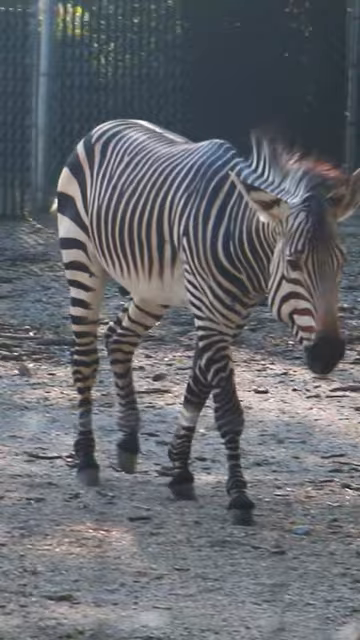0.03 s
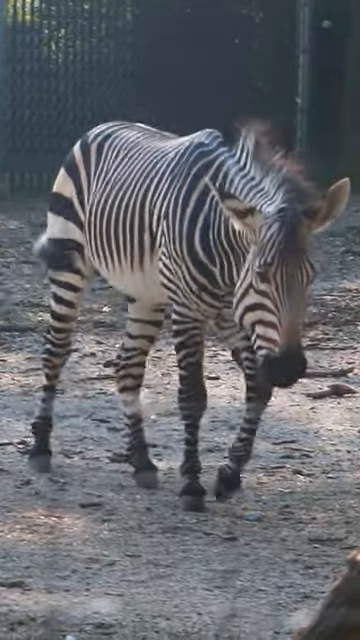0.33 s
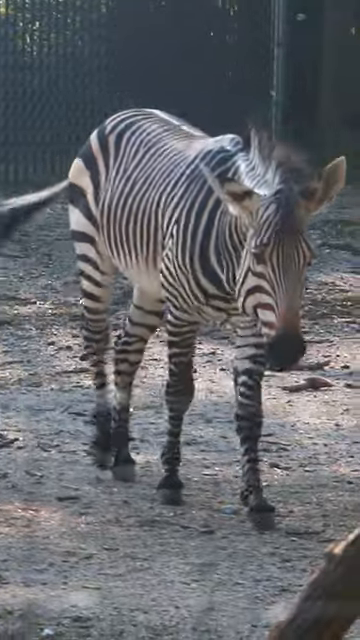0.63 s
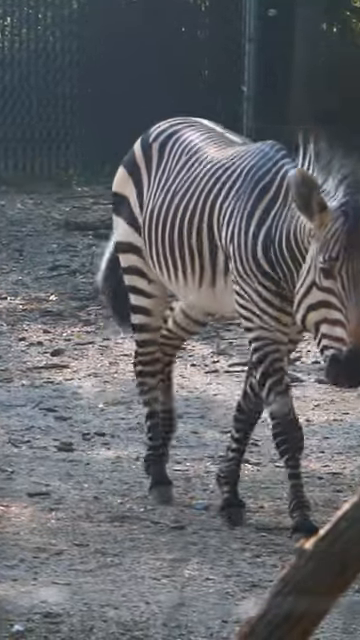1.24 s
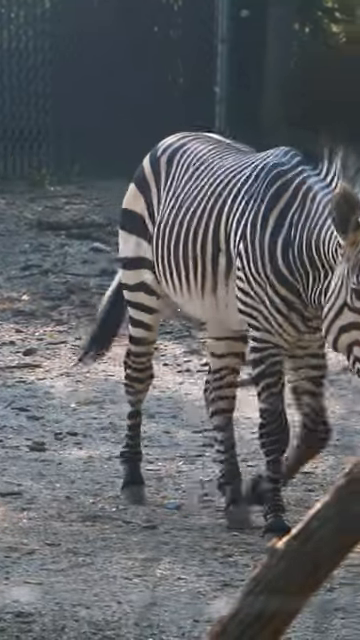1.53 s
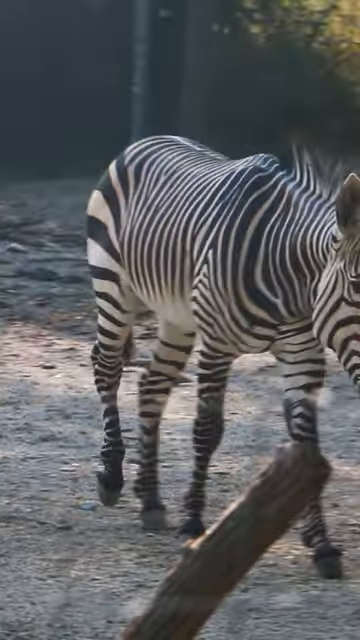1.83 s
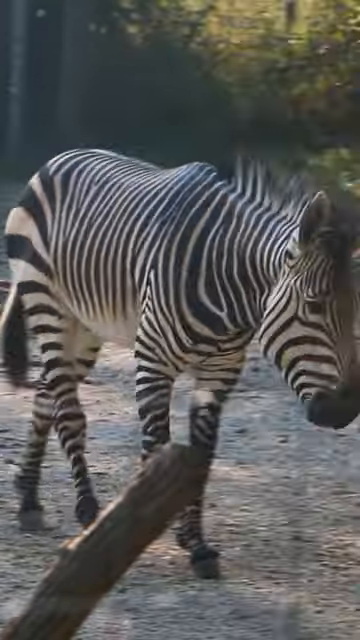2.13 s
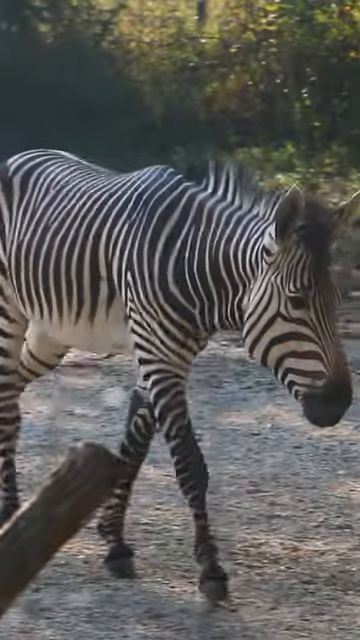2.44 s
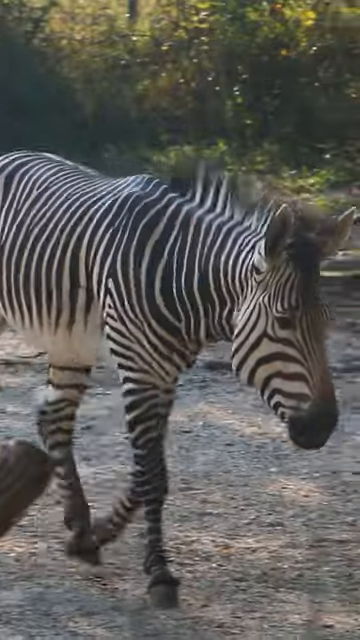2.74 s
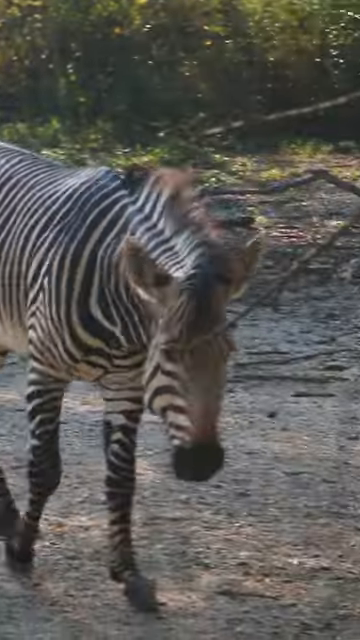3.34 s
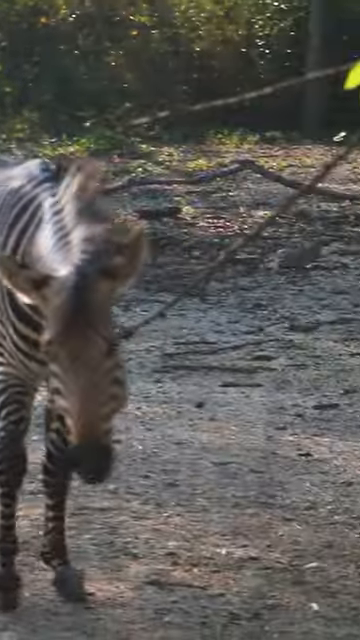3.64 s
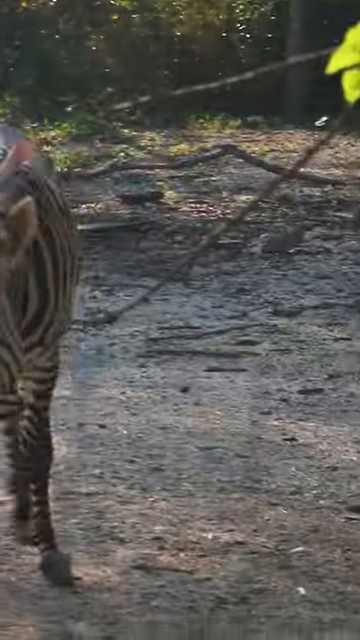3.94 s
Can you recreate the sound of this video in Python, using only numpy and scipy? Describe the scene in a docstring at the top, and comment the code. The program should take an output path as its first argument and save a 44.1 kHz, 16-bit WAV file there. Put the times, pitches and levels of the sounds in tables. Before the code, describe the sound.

A bush cricket chirps close to the microphone, high-pitched, about fourteen times a second. It rests from about 2.2 to 2.5 seconds, then continues until 4 seconds. A second cricket ticks farther off throughout. From about 2.7 to 3.2 seconds a distant bird scolds with six short, harsh notes. Soft leaf hiss, faint insects and far traffic drone underneath, and a light, deep breeze rises near the end.

```python
"""A bush cricket sings close to the microphone beside a paddock, scraping its wings in two-stroke chirps,
about fourteen a second, with one short rest. A second one ticks on farther off; foliage scatters both.
A distant bird scolds six times, uneven pulses ringing its throat. Behind them lie far traffic with
two low engine drones, a faint insect chorus, a soft hiss and a light breeze on the microphone."""
import sys
import numpy as np
from scipy import signal
from scipy.fft import rfft, irfft
from scipy.io import wavfile

SR = 44100
rng = np.random.default_rng(int(sys.argv[2]) if len(sys.argv) > 2 else 0)


def wav_record(signal):
    """Record a signal, one row per channel, as 16-bit PCM in the file named by sys.argv[1]."""
    frames = np.transpose(np.atleast_2d(signal))
    bounded = np.clip(frames, -1, 1)
    # unit amplitude maps onto the largest positive 16-bit level
    quanta = np.round(bounded * 32767).astype(np.int16)
    wavfile.write(sys.argv[1], SR, quanta)


N = 176400
TIME = np.arange(N) / SR


def from_db(db):
    """Decibels to gain."""
    return 10 ** (np.asarray(db) / 20)


def rms_one(x):
    """Scale to unit power."""
    return x / np.sqrt(np.mean(x ** 2) + 1e-20)


def gain_curve(levels):
    """Gain at every sample, from rows of (time [s], level [dB])."""
    return from_db(np.interp(TIME, *np.transpose(levels)))


def at_hz(points, hz):
    """Read a curve on a log-frequency axis."""
    f, value = np.transpose(points)
    return np.interp(np.log(np.maximum(hz, 1)), np.log(f), value)


def drift(rate_hz):
    """Random wander with spread 1, mostly slower than the given rate."""
    hz = np.fft.rfftfreq(N, 1 / SR)
    return rms_one(irfft(rfft(rng.standard_normal(N)) / (1 + (hz / rate_hz) ** 2), N))


def add(track, sound, s):
    """Mix a stereo sound in at a time."""
    i = int(s * SR)
    if 0 <= i < N:
        track[:, i:i + sound.shape[1]] += sound[:, :N - i]


# Diffuse sound at the microphone's two sides: (frequency [Hz], left-right correlation [-1..1])
STEREO_LIKENESS = [(60, 0.84), (110, 0.69), (200, 0.52), (400, 0.72), (1300, .64), (2400, 0.49),
                   (5000, 0.58), (8200, 0.45), (15000, .02)]

def wash(spectrum, flicker_db):
    """Noise of a given colour arriving from all around, its level flickering."""
    hz = np.fft.rfftfreq(N, 1 / SR)
    mid, side = rfft(rng.standard_normal((2, N))) * from_db(at_hz(spectrum, hz))
    alike = at_hz(STEREO_LIKENESS, hz)
    stereo = irfft(np.sqrt(1 + alike) * mid + np.sqrt(1 - alike) * side * [[1], [-1]], N)
    return rms_one(stereo * from_db(flicker_db * drift(6.5)))


def scatter(x, t60_s, build_s=0.0052):
    """Countless small reflections off leaves and fences, a little late and different at each side."""
    t = np.arange(SR // 2) / SR
    echoes = rng.standard_normal((2, len(t))) * from_db(-60 * t / t60_s) * np.minimum(t / build_s, 1) ** 2
    echoes /= np.sqrt(np.sum(echoes ** 2, axis=1, keepdims=True))
    return signal.fftconvolve(x[None], echoes, axes=1)[:, :N]


# Air and leaves all round the paddock: (frequency [Hz], relative density [dB])
HISS_SPECTRUM = [(500, -18), (1500, 1), (2600, -0.5), (4300, 0.5), (6000, -1.5), (7500, -4.5), (11000, -4),
                 (15500, -9.5)]

def leaf_hiss():
    """Air and leaves make a soft, nearly steady hiss."""
    return from_db(-45) * wash(HISS_SPECTRUM, flicker_db=0.5)


# Insects far from the microphone: (frequency [Hz], relative density [dB])
CHORUS_SPECTRUM = [(7400, -19), (8000, -6.5), (8700, 8), (9000, -1), (9350, 0), (10300, -7), (11200, -1.5),
                   (12300, -23), (14300, -25), (15200, -21), (16000, -37)]

def insect_chorus():
    """Far insects blur into a high, flickering band."""
    return from_db(-53) * wash(CHORUS_SPECTRUM, flicker_db=2.2)


def engine_drone(hz, wander_hz=1.0, flutter_depth=0.23):
    """One far engine tone, wandering in pitch and fluttering on its way through the air."""
    phase = 2 * np.pi * np.cumsum(hz + wander_hz * drift(2.9)) / SR
    flutter = flutter_depth * (drift(11) + 1j * drift(11))
    return rms_one(np.real((1 + flutter) * np.exp(1j * phase)))


# The far road and its rumble: (frequency [Hz], relative density [dB])
ROAD_SPECTRUM = [(40, -4), (56, 1), (75, 1.5), (110, 2.5), (170, -3.5), (250, -1), (370, -1), (700, -5.5),
                 (1000, -9.5), (1500, -18.5), (2500, -28), (6000, -29)]
RUMBLE_SPECTRUM = [(70, -21), (95, -8), (112, 2), (122, 0), (132, -9), (160, -35)]
# Road, drones and rumble from the paddock, each before its trim: (time [s], level [dB])
ROAD_LEVEL = [(0.1, -41.5), (0.82, -42.5), (0.84, -47), (0.85, -41.5), (1.73, -42), (3.9, -40)]
LOW_DRONE_LEVEL = [(.1, -54), (.25, -42), (.43, -61), (.68, -42), (.99, -52), (1.15, -36.5), (1.3, -52),
                   (1.4, -41.5), (1.55, -41), (1.7, -44), (1.88, -42), (2.33, -42), (2.44, -42),
                   (3.15, -49.5), (3.28, -42.5), (3.65, -47.5), (4, -48)]
HIGH_DRONE_LEVEL = [(0, -58), (1.4, -60), (1.9, -49.5), (2.25, -51), (3.1, -46.5), (3.55, -42.5), (4, -47)]
RUMBLE_LEVEL = [(0, -46), (1.6, -52), (2.4, -41.5), (3.3, -45.5), (4, -43)]

def traffic(low_cut_hz=52):
    """Far road noise, with two engine drones and a rumble that swell and fade."""
    road = from_db(2.5) * gain_curve(ROAD_LEVEL) * wash(ROAD_SPECTRUM, flicker_db=0.14)
    low = gain_curve(LOW_DRONE_LEVEL) * engine_drone(hz=82.46)
    high = from_db(0.5) * gain_curve(HIGH_DRONE_LEVEL) * engine_drone(hz=137.1)
    drones = (low + high) * from_db([[.7], [-.7]])   # just left of centre
    rumble = from_db(-1) * gain_curve(RUMBLE_LEVEL) * wash(RUMBLE_SPECTRUM, flicker_db=3.2)
    low_cut = signal.butter(12, low_cut_hz, "high", fs=SR, output="sos")
    return signal.sosfilt(low_cut, road + drones + rumble)


# Wind right at the microphone: (frequency [Hz], relative density [dB])
BREEZE_SPECTRUM = [(1, -10), (3, -2), (8, -3.5), (15, -9), (22, -32), (45, -42), (120, -60), (1000, -110)]
# Its strength: (time [s], level [dB])
BREEZE_LEVEL = [(0, -46), (1.2, -46.5), (2.2, -46), (3.15, -46), (3.35, -39.5), (3.85, -32.5), (4, -31)]

def breeze():
    """A light breeze presses on the microphone, very deep, and rises near the end."""
    return gain_curve(BREEZE_LEVEL) * wash(BREEZE_SPECTRUM, flicker_db=-2.5)


# Resonances of the bird's throat: (frequency [Hz], width [Hz], relative level [dB])
BIRD_THROAT = [(1954, 110, 2.5), (2135, 49, -3), (2974, 160, -0.5), (3350, 95, -0.5), (4130, 200, -15)]
# Its notes, from a distance: (start [s], length [s], relative level [dB], upper resonance boost [dB])
BIRD_NOTES = [(2.75, .027, -39.5, -2), (2.821, 0.035, -42, 1.5), (2.895, .045, -40.5, 3),
              (2.972, 0.044, -41.5, 4), (3.045, 0.047, -41, 4), (3.130, 0.046, -46, -1)]

def distant_bird(pulses_per_s=275, jitter=.16, pitch_arch=.08, edge_s=0.011, upper_above_hz=2500):
    """Harsh scolding: uneven pulses ring the throat, and each note arches in pitch."""
    cycles = np.cumsum(pulses_per_s * (1 + jitter * drift(150))) / SR
    pulses = np.diff(np.floor(cycles), prepend=0)
    rings = []
    for hz, width, db in BIRD_THROAT:
        ring = signal.lfilter(*signal.iirpeak(hz, hz / width, fs=SR), pulses)
        rings.append((hz, from_db(db) * rms_one(ring)))
    call = np.zeros(N)
    for start, length, db, boost_db in BIRD_NOTES:
        t = TIME - start
        voice = rms_one(sum(ring * from_db(boost_db * (hz > upper_above_hz)) for hz, ring in rings))
        speed = 1 - pitch_arch * np.minimum((2 * t / length - 1) ** 2, 1) ** 2   # lower at both ends
        arched = np.interp(np.cumsum(speed) / SR, TIME, voice)
        effort = np.clip(np.minimum(t, length - t) / edge_s + .5, 0, 1)
        call += from_db(db - 1) * effort * arched
    call = signal.sosfilt(signal.butter(2, [1400, 4800], "band", fs=SR, output="sos"), call)
    return call + from_db(-4.5) * scatter(call, t60_s=0.27)


TEETH_PER_S, TOOTH_JITTER, TOOTH_SPREAD_DB = 680, .1, 0.86
TOOTH_RISE_S, TOOTH_RING_S, RIGHT_LAG_S = .00022, .00065, .000022
WING_HZ, WING_SAG_HZ, SAG_S, WING_SPREAD_HZ = 10140, 1880, 0.0011, 350
OVERTONE_RATIO, OVERTONE_DB, RASP_ABOVE_HZ, RASP_DB = 1.21, -12.5, 11500, -17.5

def wing_stroke(swell_s, fade_s, sag_at_s, teeth=20):
    """A scraper crosses teeth; each rasps and rings the wing, whose pitch sags. Yields (time, sound)."""
    step, size, detune = rng.standard_normal((3, teeth))
    when = np.cumsum(1 + TOOTH_JITTER * step) / TEETH_PER_S
    when += rng.uniform(-.5, .5) / TEETH_PER_S - when.mean()   # zero is the hardest scrape
    slope_s = np.where(when < 0, swell_s, fade_s)
    force = np.exp(-.5 * (when / slope_s) ** 2) * from_db(TOOTH_SPREAD_DB * size)
    sag = 1 / (1 + np.exp((sag_at_s - when) / SAG_S))
    pitch = WING_HZ - WING_SAG_HZ * sag + WING_SPREAD_HZ * detune
    t = np.maximum(np.arange(SR // 300) / SR - np.array([[0], [RIGHT_LAG_S]]), 0)
    ring = (1 - np.exp(-t / TOOTH_RISE_S)) * np.exp(-.5 * (t / TOOTH_RING_S) ** 2)
    noise = rng.standard_normal((teeth, t.shape[1]))
    rasps = signal.lfilter(*signal.butter(2, RASP_ABOVE_HZ, "high", fs=SR), noise)
    for s, gain, hz, rasp, grip in zip(when, force, pitch, rasps, 1 - sag):
        left_db = 6 + 0.0048 * (hz - WING_HZ)   # high notes favour the microphone's left side
        pan = from_db([[left_db / 2], [-left_db / 2]])
        phase = 2 * np.pi * hz * t
        edge = from_db(OVERTONE_DB) * np.sin(OVERTONE_RATIO * phase) + from_db(RASP_DB) * rasp
        yield s, gain * pan * ring / ring.max() * (np.sin(phase) + grip * edge)


def cricket(chirps, strokes, foliage_db):
    """Wing strokes reach the microphone directly, off nearby twigs and through the foliage."""
    direct = np.zeros((2, N))
    for start, db in chirps:
        for delay, *shape in strokes:
            for s, tooth in wing_stroke(*shape):
                add(direct, from_db(db) * tooth, start + delay + s)
    mono = direct.mean(axis=0)
    twigs = from_db(-8.5) * scatter(mono, t60_s=.035)
    foliage = from_db(foliage_db) * scatter(mono, t60_s=.15)
    return direct + twigs + foliage


# The far cricket's two strokes: (peak delay [s], swell [s], fade [s], peak to half pitch sag [s])
FAR_STROKES = [(.001, 0.0093, 0.007, .0045), (0.0246, 0.0052, 0.0057, 0.0052)]
# Its effort: (time [s], relative level [dB])
FAR_EFFORT = [(0, -0.5), (1.0, -1), (2.2, -1.5), (2.4, 2.5), (2.75, -1), (4, -3)]

def far_cricket(first_s=.012, period_s=.0759):
    """Farther off, a cricket ticks evenly, about half its sound scattered by foliage."""
    beats = np.arange(first_s, N / SR, period_s)
    effort_db = np.interp(beats, *np.transpose(FAR_EFFORT))
    return from_db(-36) * cricket(zip(beats, effort_db), FAR_STROKES, foliage_db=-0.5)


# The near cricket's two strokes: (peak delay [s], swell [s], fade [s], peak to half pitch sag [s])
NEAR_STROKES = [(.0005, 0.0034, 0.0023, 0.0016), (.0230, 0.0033, 0.0033, 0.0015)]
# Its chirps, timed at the middle of the first stroke: (time [s], relative level [dB])
NEAR_CHIRPS = [(0.0591, -35), (0.1249, -33), (0.196, -32.5), (0.2647, -34), (0.3336, -33), (0.4037, -33.5),
               (0.4729, -34), (0.5412, -33.5), (0.6109, -33.5), (0.6794, -33), (0.7494, -33), (0.8193, -34),
               (0.8893, -33.5), (0.9588, -33), (1.0268, -33.5), (1.0962, -34.5), (1.1662, -33),
               (1.2323, -33), (1.3036, -34), (1.3738, -33.5), (1.4436, -33.5), (1.5129, -33), (1.582, -33),
               (1.6536, -33), (1.723, -33), (1.7938, -33), (1.8675, -33), (1.9363, -34.5), (2.0098, -33),
               (2.0847, -34), (2.1578, -34.5), (2.5025, -36), (2.5655, -34.5), (2.632, -33),
               (2.7002, -34.5), (2.7659, -34.5), (2.8317, -33.5), (2.8995, -33.5), (2.9666, -34),
               (3.0361, -32.5), (3.1027, -33.5), (3.1713, -33.5), (3.24, -33), (3.3082, -33), (3.3758, -34),
               (3.4445, -33), (3.5136, -34), (3.5837, -32.5), (3.653, -33), (3.7224, -32.5),
               (3.7937, -33.5), (3.862, -33.5), (3.9324, -34)]

def near_cricket():
    """Close to the microphone, a bush cricket's wing strokes arrive mostly direct."""
    return from_db(5.3) * cricket(NEAR_CHIRPS, NEAR_STROKES, foliage_db=-10.5)


def scene():
    """Beside the paddock: both crickets and the bird over hiss, insects, traffic and breeze."""
    crickets = near_cricket() + far_cricket()
    background = leaf_hiss() + insect_chorus() + traffic() + breeze()
    return crickets + background + distant_bird()


def record(dry):
    """The sound starts after a moment of silence; the top is cut steeply."""
    start_s, cutoff_hz = .0565, 15750
    high_cut = signal.firwin(401, cutoff_hz, fs=SR, window="blackman")
    return signal.fftconvolve(dry * (TIME >= start_s), high_cut[None], "same", axes=1)


dry = scene()
out = record(dry)
wav_record(out)
```